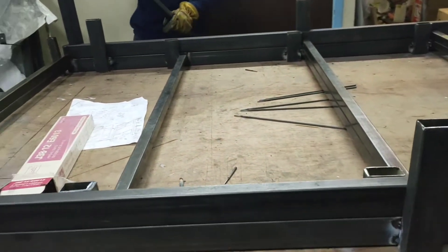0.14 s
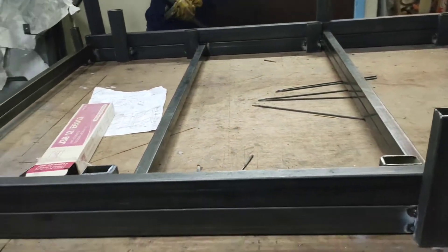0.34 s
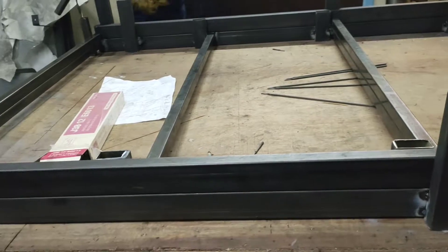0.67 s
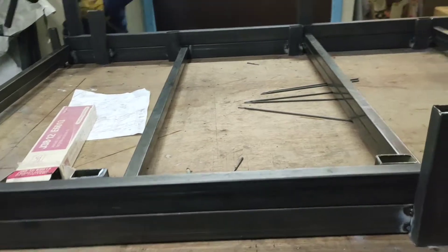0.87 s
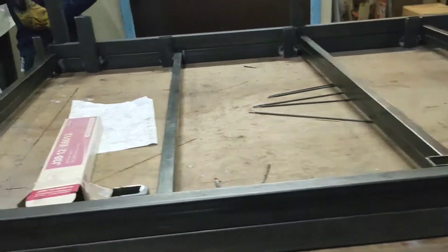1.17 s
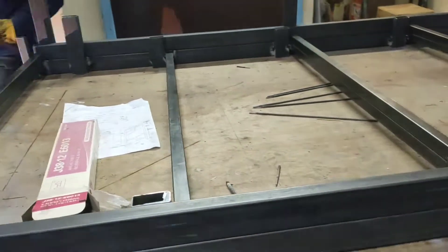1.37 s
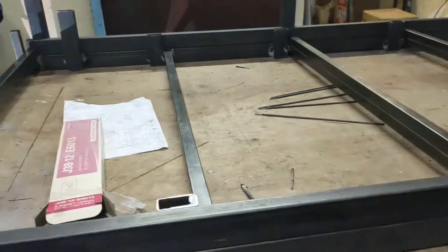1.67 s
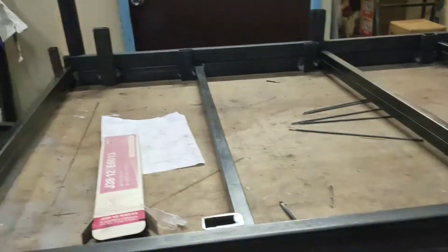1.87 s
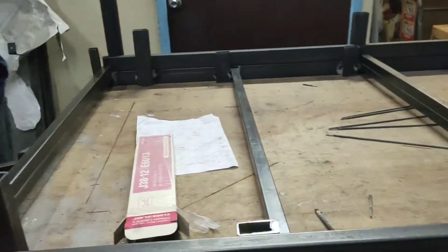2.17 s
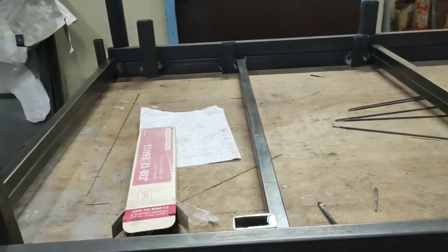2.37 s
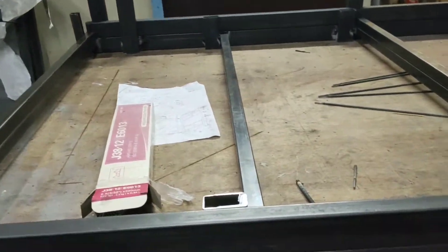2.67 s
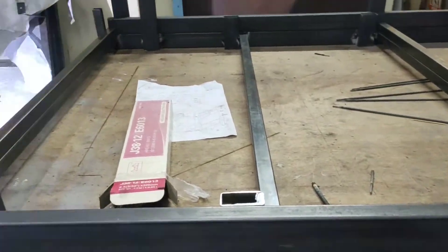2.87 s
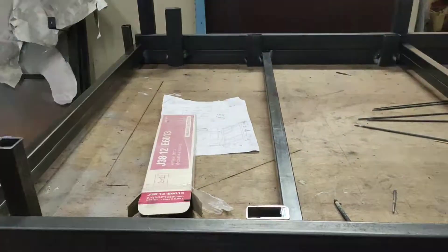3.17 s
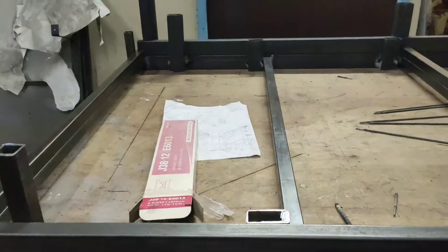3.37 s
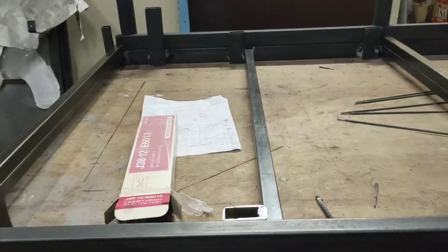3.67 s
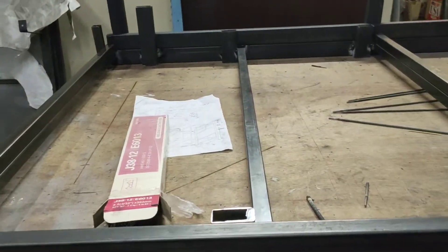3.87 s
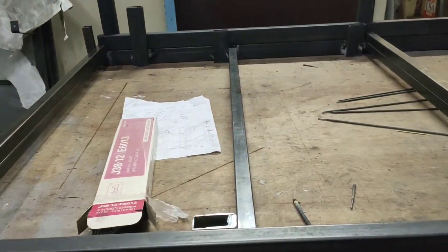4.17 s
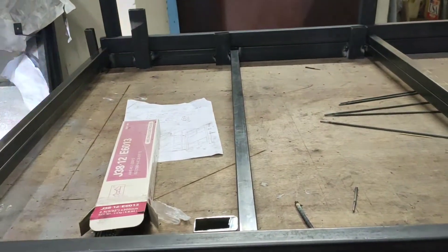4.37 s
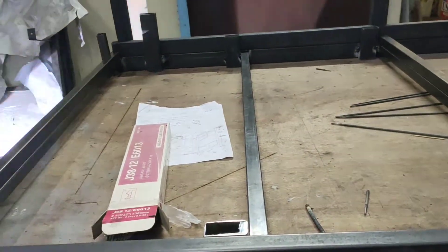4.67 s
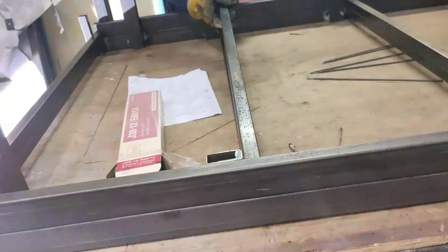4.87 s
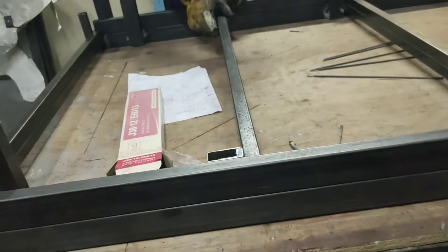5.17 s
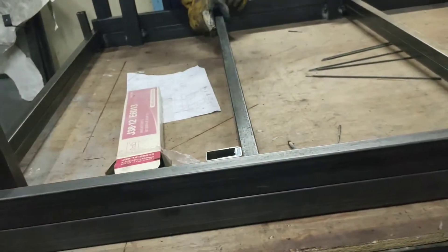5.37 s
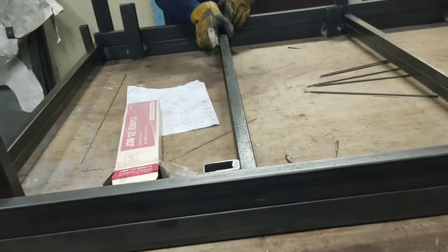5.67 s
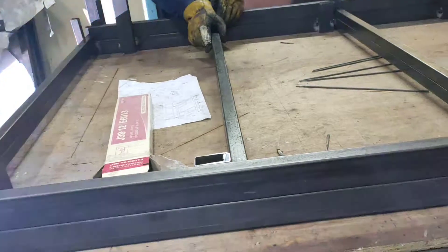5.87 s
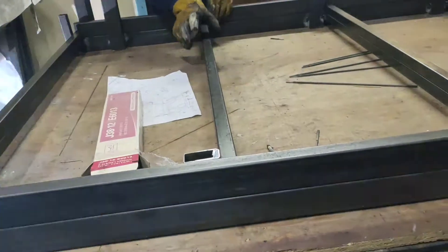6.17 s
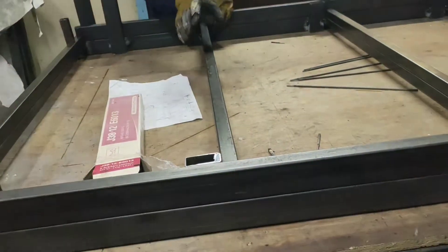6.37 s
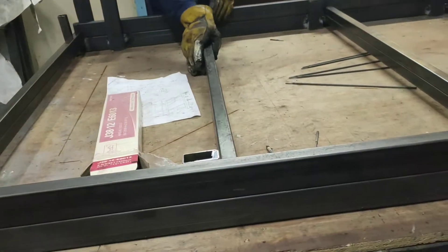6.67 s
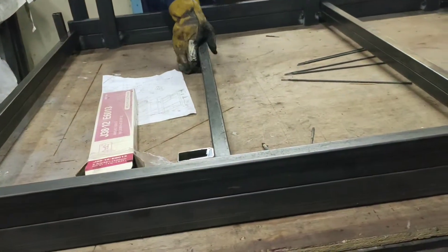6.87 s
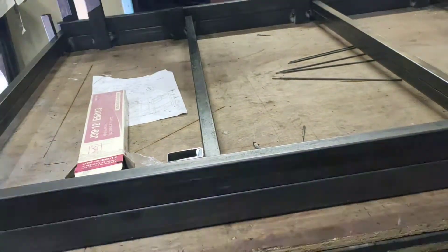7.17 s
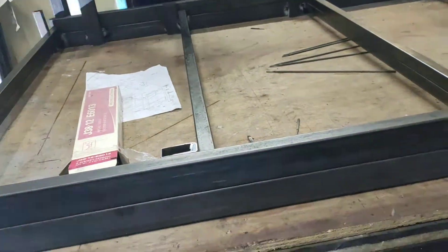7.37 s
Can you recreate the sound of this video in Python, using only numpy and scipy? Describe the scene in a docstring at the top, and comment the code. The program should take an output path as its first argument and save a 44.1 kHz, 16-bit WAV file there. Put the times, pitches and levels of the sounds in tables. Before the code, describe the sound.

In a small workshop with a low hum, a motor starts with a short growl and its whine glides upward amid fan noise. A stick-welding arc strikes, hissing densely with crackling spatter, and flares louder while air buffets the close stereo microphones. It stops abruptly. Fainter sizzles come in spells, with steel knocks, a clank trailing into a broken squeal, and a few sharp ticks near the end.

```python
"""Stick welding on a steel frame: a dense arc hiss of random sparks, crackling with spatter, flares up and
breaks off. Before it a motor starts with a growl of pulsed, resonating noise, and a whine glides up to speed
amid fan noise. Gusts of low-passed noise buffet the microphones during the arc; a machine hum and room air lie
beneath. A fainter sizzle follows in spells, with knocks of steel, small hard ticks and a clank that trails into
a squeal: noise bursts ring banks of resonances, and a fuzzy sine sings in short slips."""
import sys
import numpy as np
from scipy import signal
from scipy.fft import rfft, irfft, next_fast_len
from scipy.io import wavfile
from scipy.ndimage import uniform_filter1d, map_coordinates

SR = 44100
rng = np.random.default_rng(int(sys.argv[2]) if len(sys.argv) > 2 else 0)


def transcribe(u):
    """Save the signal u as a 16-bit wav file named by the first command-line argument.

    u: samples, shape (n,) or (channels, n), limited to [-1, 1]; the rate is SR.
    q: integer samples, one column per channel.
    """
    v = np.clip(np.atleast_2d(u).T, -1, 1)
    q = np.round(v * 32767).astype(np.int16)
    wavfile.write(sys.argv[1], SR, q)


N = 332193
T = np.arange(N) / SR

ARC_ON_S, ARC_OFF_S = 1.433, 4.627
DIRECT_SHARE, RIGHT_LAG_S = 0.2, 0.00046  # power share of direct sound; its delay at the right microphone


def amp(db):
    """Decibels to gain."""
    return 10 ** (np.asarray(db) / 20)


def unit(x):
    """Scale to rms 1."""
    return x / np.sqrt(np.mean(x ** 2) + 1e-20)


def along(points, hz):
    """Read (f/Hz, value) points on a log-frequency axis."""
    f, v = np.transpose(points)
    return np.interp(np.log(hz + 1), np.log(f + 1), v)


def ramp(start_s, length_s):
    """Go from 0 to 1 in a straight line."""
    return np.clip((T - start_s) / length_s, 0, 1)


def during(start_s, stop_s, rise_s, t60_s):
    """Rise linearly, hold, then decay exponentially after the stop."""
    return ramp(start_s, rise_s) * amp(-60 * np.maximum(T - stop_s, 0) / t60_s)


def dips(rows):
    """Level in dB that falls, stays down and recovers for each row."""
    recover_s = 0.066
    level_db = np.zeros(N)
    for start_s, stop_s, fall_s, depth_db in rows:
        level_db -= depth_db * ramp(start_s, fall_s) * (1 - ramp(stop_s, recover_s))
    return level_db


def wobble(rate_hz):
    """Smooth random curve, rate_hz knots a second."""
    knots = rng.standard_normal(int(N * rate_hz / SR) + 4)
    return map_coordinates(knots, [T * rate_hz])


def filtered(x, response):
    """Multiply the spectrum of x by a response of frequency."""
    n = x.shape[-1]
    m = next_fast_len(n + 8192)
    return irfft(rfft(x, m) * response(np.fft.rfftfreq(m, 1 / SR)), m)[..., :n]


def coloured(x, spectrum):
    """x through a (f/Hz, level/dB) spectrum, at rms 1."""
    return unit(filtered(x, lambda hz: amp(along(spectrum, hz))))


def resonating(x, modes):
    """x through (f/Hz, width/Hz, level/dB) resonances of alternating sign, at rms 1."""
    def response(f):
        total = 0
        for k, (centre, width, db) in enumerate(modes):
            bandpass = 1j * f * width / (centre * centre - f * f + 1j * f * width)
            total = total + (-1) ** k * amp(db) * bandpass
        return total
    return unit(filtered(x, response))


def panned(left_right_db):
    """Left and right gains for a level difference."""
    return amp([[left_right_db / 2], [-left_right_db / 2]])


def lag_right(left, right):
    """Stereo pair whose right side arrives later."""
    return np.array([left, np.roll(right, round(RIGHT_LAG_S * SR))])


def noise():
    """White noise at two microphones: a diffuse part alike only in the bass, plus a direct part later on the right."""
    spacing_s = 0.00045
    a, b, direct = rng.standard_normal((3, N))
    mid = filtered(a, lambda hz: np.sqrt((1 + np.sinc(2 * hz * spacing_s)) / 2))
    side = filtered(b, lambda hz: np.sqrt((1 - np.sinc(2 * hz * spacing_s)) / 2))
    diffuse = np.array([mid + side, mid - side])
    return np.sqrt(1 - DIRECT_SHARE) * diffuse + np.sqrt(DIRECT_SHARE) * lag_right(direct, direct)


def narrow(width_hz):
    """Slow stereo noise that turns a tone into a fuzzy band."""
    return unit(filtered(rng.standard_normal((2, N)), lambda hz: 1 / (1 + (hz / width_hz) ** 4)))


def patchy(x):
    """Narrow bands swell and fade by a few dB, each on its own."""
    depth_db = 2.6  # rms
    z = signal.stft(x, nperseg=1024)[2]
    field = uniform_filter1d(rng.standard_normal(z.shape[1:]), size=5, axis=0)
    field = uniform_filter1d(field, size=9, axis=1)
    return unit(signal.istft(z * amp(depth_db * unit(field)), nperseg=1024)[1][:, :N])


def glancing(x):
    """Treble glances off bench and frame: early copies on slowly drifting paths send ridges through the hiss."""
    near_s, far_s, copy_db = 0.0018, 0.009, -4
    drift_s, above_hz = 0.00006, 3600
    treble = filtered(x, lambda hz: 1 - 1 / (1 + (hz / above_hz) ** 8))
    ridged = treble
    for detour_s in np.geomspace(near_s, far_s, 6):
        at = (T - detour_s * rng.uniform(0.9, 1.1) - drift_s * wobble(2)) * SR
        copy = np.array([map_coordinates(side, [at], order=3) for side in treble])
        ridged = ridged + amp(copy_db) * copy
    return x - treble + ridged * np.std(treble) / np.std(ridged)


def sparks(rate_hz, life_s):
    """Envelope of random bursts of uneven size, each decaying exponentially, at rms 1."""
    bursts = (rng.random(N) < rate_hz / SR) * rng.exponential(size=N)
    return unit(signal.lfilter([1], [1, -np.exp(-1 / (life_s * SR))], bursts))


def pops(rate_hz):
    """Single-sample pulses at random times and of uneven size, a little later on the right."""
    pulses = (rng.random(N) < rate_hz / SR) * rng.uniform(-0.88, 1, (2, N))
    return lag_right(*pulses)


def room(x):
    """Workshop echo: convolution with decaying noise, shortest in the high treble."""
    # echo decay: f/Hz, t60/s
    decay_times = [(200, 0.15), (2000, 0.47), (12000, 0.015)]
    hz, t, z = signal.stft(rng.standard_normal((2, SR // 2)), SR, nperseg=256)
    decay = amp(-60 * t / along(decay_times, hz)[:, None])
    tail = signal.istft(z * decay, SR, nperseg=256)[1]
    return signal.fftconvolve(x, tail / np.linalg.norm(tail[0]), axes=1)[:, :N]


def workshop():
    """A machine's wavering sine hum over coloured room air; both dip together."""
    # workshop air: f/Hz, level/dB
    air_spectrum = [(15, -68), (25, -18), (54, -15.5), (90, -16.5), (103, -12.5), (139, -21), (278, -21),
                    (344, -22.5), (394, -19.5), (637, -29), (769, -25.5), (3540, -39), (10300, -43.5),
                    (15000, -61)]
    # shared dips of hum and air: start/s, stop/s, fall/s, depth/dB
    hum_dips = [(1.28, 4.62, 0.19, 12), (5.69, 5.8, .04, 12), (5.85, 5.95, 0.036, 7), (7.03, 7.2, 0.036, 7)]
    hum_hz, hum_db, air_db = 88, -33.5, -40
    dip_db = dips(hum_dips)
    phase = 2 * np.pi * np.cumsum(hum_hz + 0.77 * wobble(9)) / SR
    hum = amp(hum_db + dip_db + 0.72 * wobble(35) + 0.67 * wobble(7.7)) * np.sin(phase)
    air = amp(air_db + dip_db) * coloured(noise(), air_spectrum)
    return hum + air


def motor():
    """Starting torque rasps and shakes the housing; a rough whine climbs with the speed while the fan blows."""
    # housing modes: f/Hz, width/Hz, level/dB
    housing_modes = [(395.7, 13.6, -5.5), (440, 49, -6), (496.5, 37, -2), (558, 45, -8.5), (617.3, 12.7, 5),
                     (644, 57, -11.5), (770, 38, -35), (906, 13.5, -12)]
    # starting rasp: f/Hz, level/dB
    rasp_spectrum = [(150, -16), (330, 3), (720, 11), (1150, 7), (1350, 3), (1700, -3), (2400, -8),
                     (2800, -27), (5000, -34)]
    # fan air: f/Hz, level/dB
    fan_spectrum = [(40, -36), (88, -26), (200, -13.5), (364, -9), (624, -4.5), (900, -4), (1300, -6),
                    (1750, -2), (2150, 0), (2480, -2.5), (2850, -7), (3500, -6.5), (5400, -10),
                    (7100, -8.5), (9300, -9), (11000, -19), (15300, -25)]
    # whine gain as it climbs through resonances: f/Hz, level/dB
    whine_colour = [(2300, 1), (2600, -11), (2800, -4), (3020, -2), (3130, -3), (3360, -1), (3450, 2),
                    (3560, 3), (3680, 1)]
    on_s, jolt_end_s, fade_s = 0.3793, 0.56, 2.485
    start_hz, full_hz, spin_up_s = 1277, 3930, 0.415  # exponential time constant
    jolt_db, running_db, rasp_db = -17, -34.5, -23.5
    fan_db, fan_sag_db = -20.5, 4.05  # the fan drops once the arc burns
    whine_db, overtone_db = -28, -4

    running = during(on_s, fade_s, rise_s=0.016, t60_s=1.6)
    jolt = during(on_s, jolt_end_s, rise_s=0.023, t60_s=1.2)
    # the torque pulses twice in each mains cycle
    torque = 2 * np.pi * 120 * T
    housing = resonating(noise() * (1 + np.cos(torque)), housing_modes) + amp(-17) * np.sin(torque)
    growl = np.hypot(amp(jolt_db) * jolt, amp(running_db) * running) * housing
    rasp = amp(rasp_db) * jolt * coloured(noise() * (1 + 0.53 * np.cos(torque)), rasp_spectrum)

    fan_level_db = fan_db - fan_sag_db * ramp(ARC_ON_S, 0.02) + wobble(12.24)
    fan = amp(fan_level_db) * running * coloured(patchy(glancing(noise())), fan_spectrum)

    whine_hz = full_hz - (full_hz - start_hz) * np.exp(-np.maximum(T - on_s, 0) / spin_up_s)
    phase = 2 * np.pi * np.cumsum(whine_hz * (1 + 0.00486 * wobble(25.04))) / SR
    fuzz = unit(1 + 0.78 * narrow(width_hz=90))
    overtone = amp(overtone_db) * narrow(width_hz=150) * np.sin(2 * phase)
    whine_level_db = whine_db + along(whine_colour, whine_hz) + wobble(13.7)
    whine = amp(whine_level_db) * (fuzz * np.sin(phase) + overtone)
    return growl + rasp + fan + whine * during(on_s, ARC_ON_S, rise_s=0.25, t60_s=0.08)


def draught():
    """Gusts of air roar and flutter across each microphone port separately, as eddy-modulated noise."""
    # gusts: centre/s, half length/s, roar/dB, rumble/dB
    gusts = [(2.834, 0.07, -27.5, -28), (3.395, 0.17, -23, -23.5), (3.743, 0.21, -19, -23),
             (3.967, 0.018, -26, -25), (4.273, 0.048, -28, -26), (4.535, 0.2, -20, -24.5)]
    # roar: f/Hz, level/dB
    roar_spectrum = [(150, -17), (350, -0.5), (600, 3), (1200, 2), (2400, -0.5), (4000, 0), (7000, -23.5),
                     (15000, -30)]
    # rumble: f/Hz, level/dB
    rumble_spectrum = [(20, -16), (45, -5), (80, -3.5), (200, -4.5), (330, -4.5), (600, -10.5), (1500, -38)]
    breeze_db, flutter_db = -30.5, -28  # roar and rumble between the gusts
    roar_power, rumble_power = amp(breeze_db) ** 2, amp(flutter_db) ** 2
    for centre_s, half_s, roar_db, rumble_db in gusts:
        gust = np.exp(-((T - centre_s) / half_s) ** 2)
        roar_power = roar_power + amp(roar_db) ** 2 * gust
        rumble_power = rumble_power + amp(rumble_db) ** 2 * gust
    eddies = amp(2.5 * np.array([wobble(160), wobble(160)]))
    roar = np.sqrt(roar_power) * coloured(rng.standard_normal((2, N)) * eddies, roar_spectrum)
    flutter = np.sqrt(rumble_power) * coloured(rng.standard_normal((2, N)) * eddies, rumble_spectrum)
    # the flutter swells in as the arc flares
    return (roar * during(2.0, ARC_OFF_S, rise_s=0.77, t60_s=0.08)
            + flutter * during(2.54, ARC_OFF_S, rise_s=0.21, t60_s=0.055))


def groans():
    """The shifted frame sings briefly on one low mode, a sine blurred by slow noise."""
    # groans: start/s, stop/s, level/dB
    groan_rows = [(4.845, 4.9, -40), (5.14, 5.21, -43)]
    groan_hz = 634
    level = sum(amp(db) * during(start_s, stop_s, rise_s=0.023, t60_s=0.24)
                for start_s, stop_s, db in groan_rows)
    return level * unit(narrow(width_hz=45) * np.sin(2 * np.pi * groan_hz * T))


def squeal():
    """Rubbed steel sings on one mode in separate slips; where it scrapes, it catches and rattles other modes."""
    # singing slips: start/s, stop/s, level/dB at the start
    slips = [(5.866, 5.985, -29), (6.02, 6.065, -33), (6.1, 6.175, -34), (6.25, 6.28, -37),
             (6.315, 6.35, -33), (6.4, 6.47, -42)]
    # rattling scrapes: start/s, stop/s, level/dB at the start
    scrapes = [(5.87, 5.91, -22.5), (5.93, 6.0, -36), (6.03, 6.19, -38), (6.333, 6.38, -38)]
    # other modes of the bar: f/Hz, width/Hz, level/dB
    bar_modes = [(2100, 46, 6), (2300, 79, -4), (2600, 80, -3), (2810, 40, 5.5), (3090, 59, 2.5),
                 (4340, 110, -12), (5900, 90, -14), (6360, 80, -20), (7040, 120, -12)]
    squeal_hz, sag_db_per_s = 2758, 25

    def strokes(rows, t60_s):
        level = np.zeros(N)
        for start_s, stop_s, db in rows:
            sagging = amp(db - sag_db_per_s * np.maximum(T - start_s, 0))
            level += sagging * during(start_s, stop_s, 0.008, t60_s)
        return level

    fuzz = unit(1 + 0.5 * narrow(width_hz=70))
    tone = fuzz * np.sin(2 * np.pi * np.cumsum(squeal_hz + 6 * wobble(30)) / SR)
    catches = 0.3 + np.tanh(sparks(rate_hz=400, life_s=0.001))
    rattle = resonating(noise() * catches, bar_modes)
    return (strokes(slips, t60_s=0.1) * tone + strokes(scrapes, t60_s=0.14) * rattle) * panned(-3)


def knocks():
    """Each blow rings the frame's crowded modes as decaying noise; the clearest modes have a decay of their own."""
    # blows: time/s, level/dB, brightness/(dB per octave), t60/s, left-right/dB
    blows = [(4.802, -21, -3, 0.19, -2.5), (4.973, -31.5, -4, 0.17, -7), (5, -31, 3, 0.14, 1),
             (5.535, -36, 4, 0.2, -8), (5.872, -19, 1.5, 0.19, -4), (5.965, -31.5, 4, 0.34, -12)]
    # crowded modes: f/Hz, level/dB
    frame_spectrum = [(80, -19), (250, 0), (400, 2.5), (900, -3), (1500, -3.5), (2300, 1), (3200, -1),
                      (4800, -4.5), (7000, -1), (9500, -20), (15000, -47.5)]
    # clearest modes: f/Hz, width/Hz, level/dB
    frame_modes = [(390, 45, -1), (610, 23, -18), (1340, 32, -4), (2100, 44, -3), (2476, 44, -5),
                   (3020, 21, -1)]
    ring_db, ring_t60_s = -9, 0.36  # ring level relative to its blow
    out = np.zeros((2, N))
    crowd, clear = coloured(noise(), frame_spectrum), resonating(noise(), frame_modes)
    for at_s, db, bright_db, t60_s, pan_db in blows:
        tilt = lambda hz: amp(bright_db * np.log2((hz + 200) / 2000))
        blow = unit(filtered(crowd, tilt)) * during(at_s, at_s, 0.0007, t60_s)
        ring = unit(filtered(clear, tilt)) * during(at_s, at_s, 0.0018, ring_t60_s)
        out += amp(db) * (blow + amp(ring_db) * ring) * panned(pan_db)
    return out


def ticks():
    """Small hard contacts: a bright noise snap with a brief rustle, on a short low push."""
    # ticks: time/s, snap/dB, push/dB before a fixed lift, left-right/dB
    contacts = [(5.7006, -19, -31, 12.5), (5.8588, -15, -50, -6), (5.8668, -9, -50, 7),
                (5.89, -21, -46, -2), (7.0236, -16, -57, -4), (7.072, -18, -24.5, 25), (7.163, -12, -56, 2)]
    # snap: f/Hz, level/dB
    snap_spectrum = [(800, -12), (2500, -9), (6500, 5), (10000, -1.5), (15000, -5)]
    push_lift_db = 10.5
    out = np.zeros((2, N + SR))
    t = np.arange(SR // 10) / SR
    snap_decay, rustle_decay = amp(-60 * t / 0.0063), amp(-9.5 - 60 * t / 0.15)
    u = t / 0.002
    push = (1 - u) * np.exp(-u)
    for at_s, snap_db, push_db, pan_db in contacts:
        snap = coloured(rng.standard_normal((2, len(t))), snap_spectrum) * (snap_decay + rustle_decay)
        tick = amp(snap_db) * snap - amp(push_db + push_lift_db) * push
        first = round(at_s * SR)
        out[:, first:first + len(t)] += tick * panned(pan_db)
    return out[:, :N]


def embers():
    """A fainter sizzle of crackling, gritty noise with a duller body, in spells once the arc has broken."""
    # spells: start/s, stop/s, rise/s, t60/s, sizzle/dB, body/dB
    spells = [(4.627, 4.673, .01, 0.66, -29.5, -33), (4.933, 5.005, 0.075, 0.44, -33, -30.5),
              (5.01, 5.273, 0.07, 2, -34, -36), (5.531, 5.58, 0.018, 0.29, -29, -34.5),
              (5.622, 5.783, 0.022, .3, -31.5, -47), (5.778, 5.985, 0.039, 0.78, -25, -34),
              (6.0, 6.306, 0.083, 0.71, -39, -40.5), (6.822, 7.212, 0.11, 0.64, -31, -42.5)]
    # sizzle: f/Hz, level/dB
    sizzle_spectrum = [(1650, -47), (2800, -15), (3600, -4), (4900, -5.5), (5700, -1), (7000, -0.5),
                       (9700, -2.5), (11000, -8.5), (13000, -9.5), (15300, -7.5)]
    # duller body: f/Hz, level/dB
    body_spectrum = [(200, -4), (450, 3.5), (630, -1), (900, -1.5), (1500, -0.5), (2200, 2.5), (2700, -1.5),
                     (3300, -9), (5000, -37)]
    smoulder_db, smoulder_body_db = -52.5, -49  # sizzle and body between the spells
    smoulder = ramp(ARC_OFF_S, 0.01)
    sizzle_power = (amp(smoulder_db) * smoulder) ** 2
    body_power = (amp(smoulder_body_db) * smoulder) ** 2
    for start_s, stop_s, rise_s, t60_s, sizzle_db, body_db in spells:
        spell = during(start_s, stop_s, rise_s, t60_s)
        sizzle_power += (amp(sizzle_db) * spell) ** 2
        body_power += (amp(body_db) * spell) ** 2
    crackle = unit(1 + 0.15 * sparks(rate_hz=600, life_s=0.0008))
    grit = amp(-9) * unit(pops(rate_hz=220))
    sizzle = coloured(patchy(glancing(noise())) * crackle + grit, sizzle_spectrum)
    body = coloured(noise() * crackle + grit, body_spectrum)
    return np.sqrt(sizzle_power) * sizzle + np.sqrt(body_power) * body


def spits():
    """Short bright bursts of hiss before the arc holds, the last as it strikes."""
    # bursts: start/s, stop/s, level/dB
    bursts = [(0.258, 0.261, -33), (.386, 0.416, -24), (1.116, 1.133, -23), (1.149, 1.437, -29.5),
              (1.277, 1.286, -32), (1.434, 1.446, -20)]
    # burst colour: f/Hz, level/dB
    spit_spectrum = [(2000, -8.5), (5000, -1), (9000, 2), (12000, -7.5), (15000, -7)]
    level = sum(amp(db) * during(start_s, stop_s, rise_s=0.0054, t60_s=0.15)
                for start_s, stop_s, db in bursts)
    return level * coloured(patchy(noise()), spit_spectrum)


def arc():
    """Dense sparks hiss and set the steel singing; molten spatter crackles on top."""
    # hiss: f/Hz, level/dB
    hiss_spectrum = [(1200, -30.5), (2200, -9.5), (3200, -11), (4900, -9), (5700, -2.5), (6500, -3.5),
                     (7000, -2), (8000, -4.5), (9900, -4.5), (10800, -9), (12500, -9), (15200, -9)]
    # singing frame modes: f/Hz, width/Hz, level/dB
    singing_modes = [(5426, 70, -9), (5790, 90, -8), (6210, 80, -6), (7206, 50, -4), (7602, 50, -3),
                     (8021, 70, -4), (8698, 65, 0), (9176, 45, -1), (9581, 35, -4), (10020, 30, 0),
                     (10383, 40, -8)]
    # spatter: f/Hz, level/dB
    spatter_spectrum = [(80, -38), (300, -13), (700, 1.5), (1300, -8), (2300, 1), (3500, -2.5),
                        (6000, -2.5), (9000, 6), (15000, -12.5)]
    arc_db, spatter_db, focus_db = -15.5, -12.5, -5  # spatter and focus relative to the arc level
    flare_s, flare_rise_s, flare_db = 2.58, 0.14, 3  # stays louder afterwards
    focus_hz, flared_hz, glide_s = 9400, 8510, 0.8
    level_db = arc_db + flare_db * ramp(flare_s, flare_rise_s) + 0.5 * wobble(19) + 0.4 * wobble(60)

    crackle = unit(1 + 0.17 * sparks(rate_hz=900, life_s=0.00085))
    hiss = coloured(noise() * crackle, hiss_spectrum)
    singing = 0.42 * resonating(noise(), singing_modes)
    # a narrow band of hiss drifts down as the arc flares
    centre_hz = focus_hz + (flared_hz - focus_hz) * ramp(flare_s - glide_s / 2, glide_s)
    focus = narrow(width_hz=780) * unit(np.cos(2 * np.pi * np.cumsum(centre_hz) / SR))
    clumped = pops(rate_hz=300) * amp(3 * wobble(29.97))
    spatter = amp(spatter_db) * coloured(clumped, spatter_spectrum)

    burn = patchy(glancing(hiss + amp(focus_db) * focus) + singing) + spatter
    return amp(level_db) * burn * during(ARC_ON_S, ARC_OFF_S, rise_s=0.0061, t60_s=0.051)


def scene():
    """All sources in the workshop, with echo on the weld and the steel."""
    weld = arc() + draught()
    steel = knocks() + groans() + squeal()
    echo = room(amp(-15) * weld + amp(-10) * steel)
    return workshop() + motor() + spits() + embers() + ticks() + weld + steel + echo


def record(dry):
    """Colour each microphone, dip the left one briefly, round off the highest peaks and limit the band."""
    # microphone colour difference: f/Hz, left-right/dB
    ear_colour = [(500, -0.5), (1100, -0.5), (2200, -2), (4500, -0.5), (6500, -4), (8500, 2.5),
                  (12000, -0.5)]
    # left channel dips: start/s, stop/s, fall/s, depth/dB
    left_dips = [(5.705, 6.04, 0.029, 4.5), (7.03, 7.22, .04, 7.5)]
    ceiling, top_hz = 0.9, 15500
    left, right = filtered(dry, lambda hz: amp(np.outer([0.5, -0.5], along(ear_colour, hz))))
    sound = np.array([left * amp(dips(left_dips)), right])
    sound = sound / (1 + (sound / ceiling) ** 6) ** (1 / 6)
    return filtered(sound, lambda hz: hz < top_hz)


dry = scene()
out = record(dry)
transcribe(out)
```